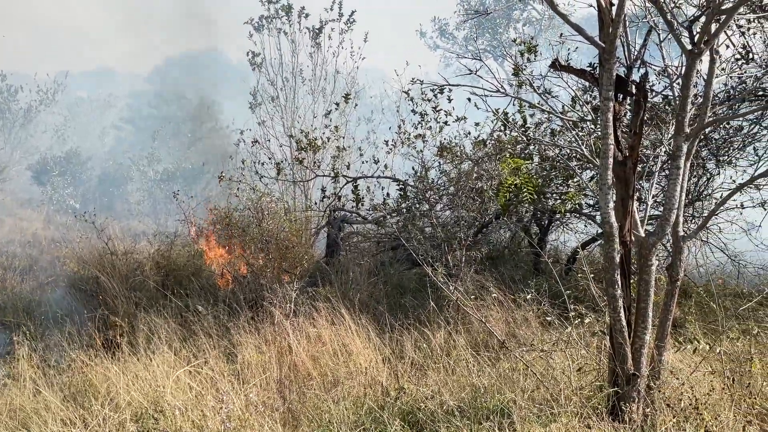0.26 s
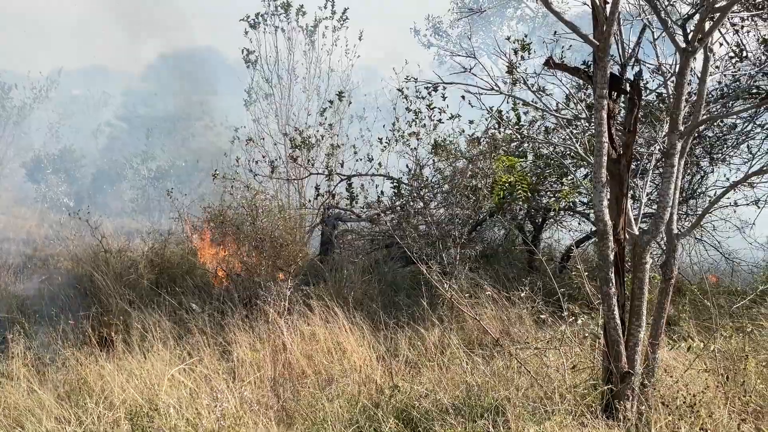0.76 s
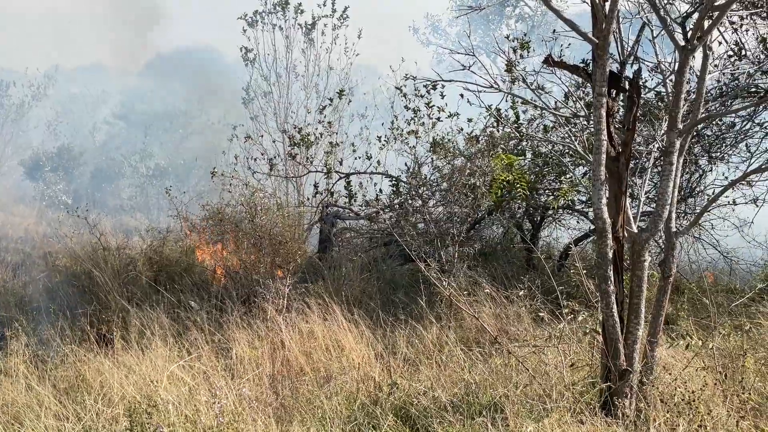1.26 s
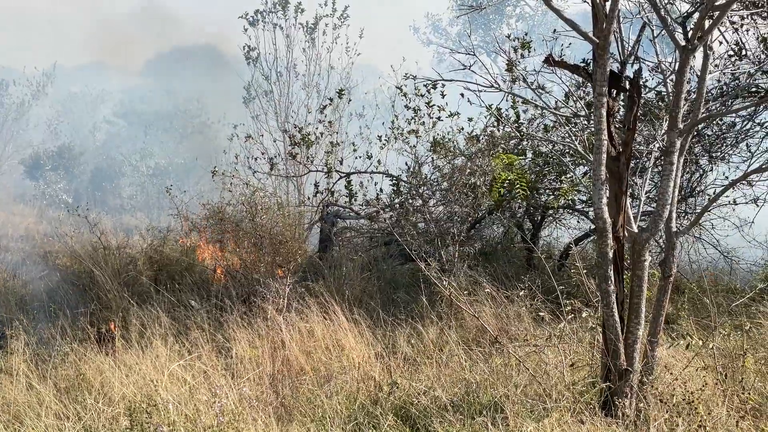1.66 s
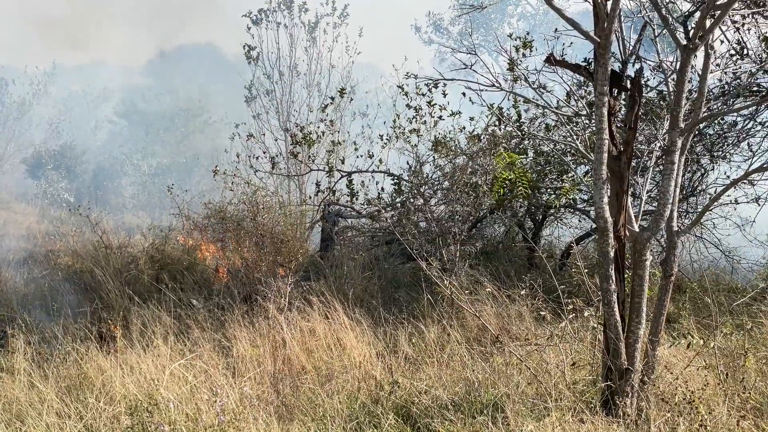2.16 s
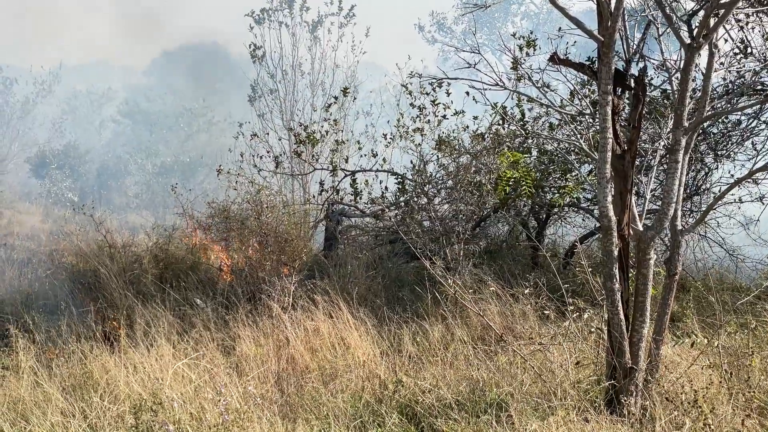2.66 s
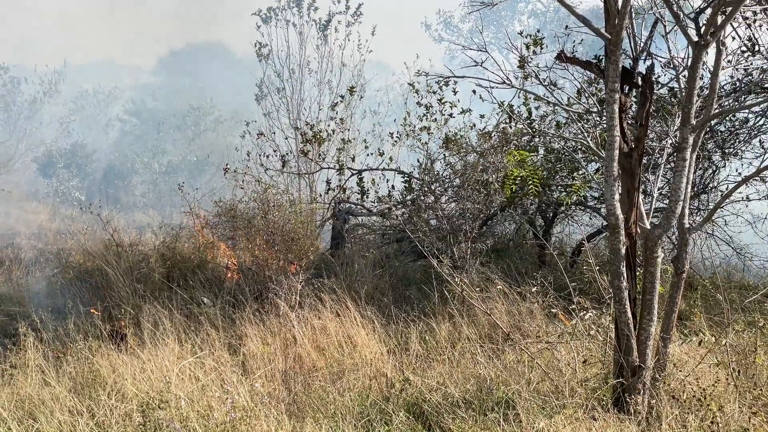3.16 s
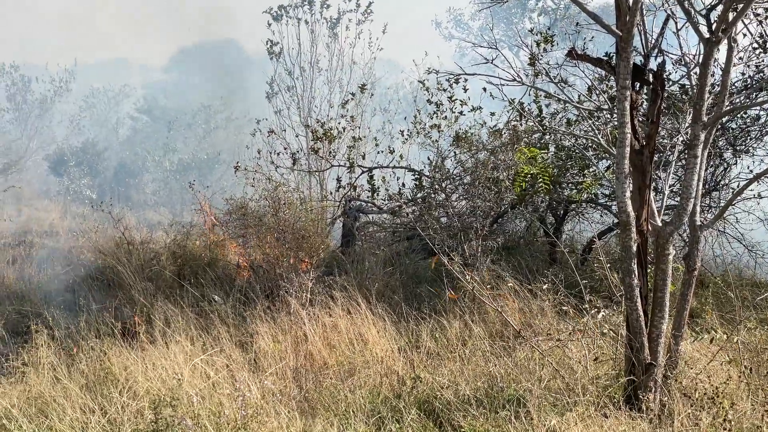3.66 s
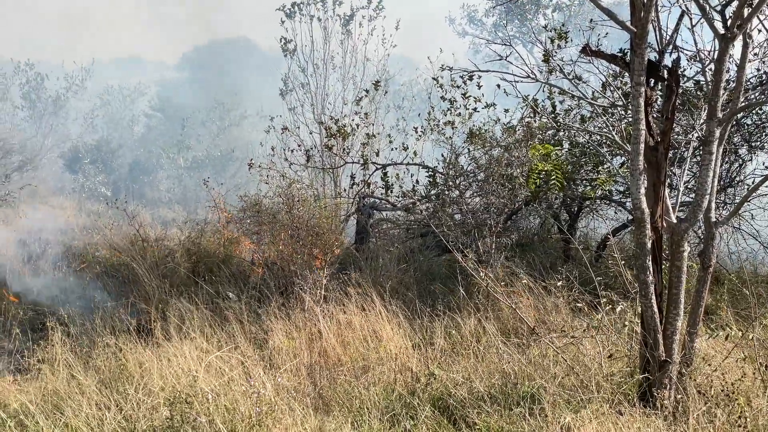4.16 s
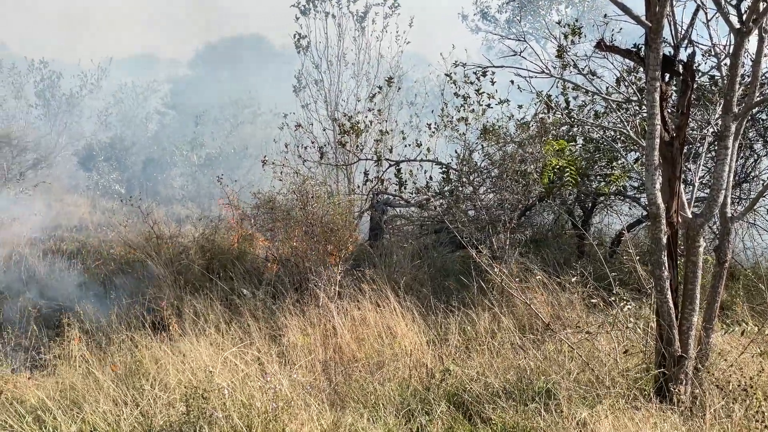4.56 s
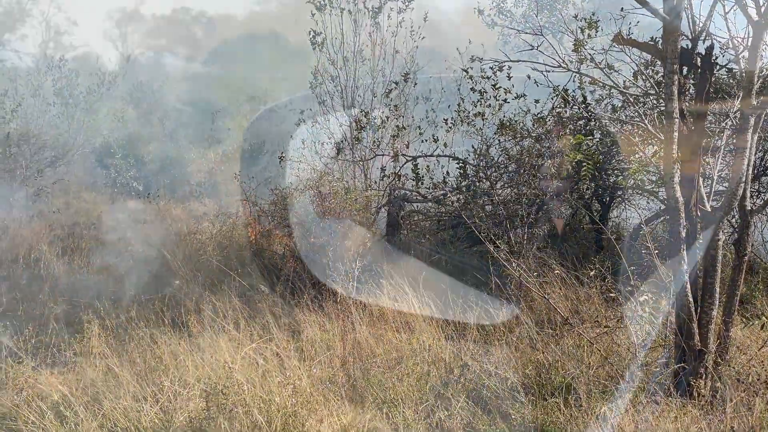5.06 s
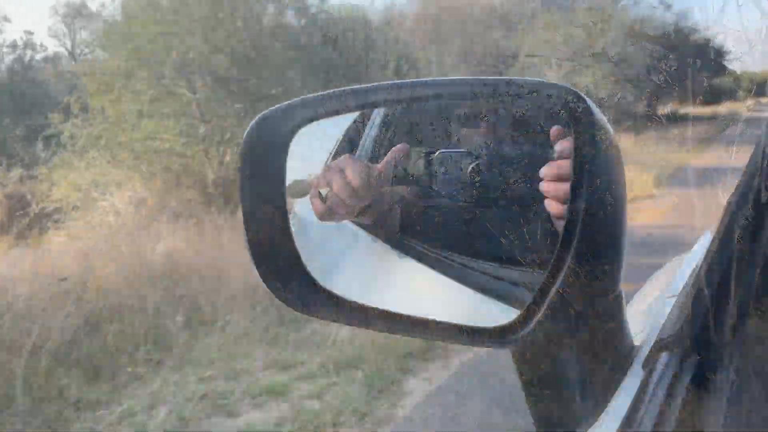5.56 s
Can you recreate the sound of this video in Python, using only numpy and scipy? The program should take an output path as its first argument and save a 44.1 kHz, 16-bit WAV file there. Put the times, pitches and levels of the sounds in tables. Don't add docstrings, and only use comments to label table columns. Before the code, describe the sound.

Outdoors, burning dry grass and shrubs make a dense fine crackle with steady hiss and a quiet low roar. Sharp bright pops burst irregularly, with a branch tearing and a big crack about two and a half seconds in. Pops then thin out, apart from a tight cluster after three and a half seconds. At the end the fire fades and wind rumbles and thuds on the stereo microphone.

```python
import sys
import numpy as np
from scipy import signal
from scipy.fft import rfft, irfft, next_fast_len
from scipy.io import wavfile
from scipy.ndimage import uniform_filter1d

SR = 44100
rng = np.random.default_rng(int(sys.argv[2]) if len(sys.argv) > 2 else 0)


def elevation(decibels):
    levels = np.asarray(decibels, float)
    return 10 ** (levels / 20)


def dump(signal):
    limited = np.clip(np.atleast_2d(signal).T, -1, 1)
    pcm = np.round(limited * 32767).astype(np.int16)
    wavfile.write(sys.argv[1], SR, pcm)


N = 255780

# (time [s], level [dB])
BLAZE_LEVEL = [(0, -49), (.68, -49), (1.87, -50), (2.24, -48.5), (3, -49.5), (4.3, -51), (4.57, -50.5),
               (5.0, -51), (5.3, -56), (5.5, -65.5), (5.65, -77), (5.8, -99)]
# (frequency [Hz], density [dB per Hz])
HISS_SPECTRUM = [(300, -16), (700, -12), (1300, -1.5), (2200, -4), (3200, -1.5), (5500, 1), (7500, 2),
                 (8700, -0.5), (10500, -1), (13500, -5.5), (14800, -3), (15900, -14.5), (16200, -27),
                 (17000, -37)]
# (frequency [Hz], density [dB per Hz])
ROAR_SPECTRUM = [(12, -28), (20, -17.5), (49, 3), (81, 0), (204, -4.5), (323, -13), (700, -20), (910, -30),
                 (1540, -120)]
ROAR_DB, CRACKLE_DB, HISS_DB, TICKS_DB = -53.5, 0, -0.5, -3.5
STEADY_EDGE_HZ = 15950

# (time [s], level [dB])
WIND_LEVEL = [
    (4.95, -51.5),
    (5.1, -50),
    (5.24, -36),
    (5.33, -42),
    (5.4, -37.5),
    (5.46, -40.5),
    (5.61, -34),
    (5.67, -37.5),
    (5.8, -35.5),
]
# (frequency [Hz], density [dB per Hz])
BUFFET_SPECTRUM = [(15, -27), (30, -11), (50, 5.5), (85, -3.5), (150, -12), (230, -17.5), (400, -29.5),
                   (1000, -43), (3000, -57), (8000, -86)]
# (time [s], peak [dB], edge re peak [dB])
EDDY_THUDS = [(5.133, -49, -33), (5.167, -45.5, -33), (5.203, -45, -22), (5.248, -46, -35),
              (5.302, -37, -36), (5.309, -40.5, -27), (5.376, -38.5, -15), (5.41, -41, -11),
              (5.423, -42.5, -28), (5.467, -54, -35), (5.488, -42, -39), (5.502, -43, -39),
              (5.526, -39, -26), (5.571, -47, -38), (5.601, -34.5, -16), (5.611, -37, -34),
              (5.627, -42.5, -38), (5.648, -42.5, -39), (5.701, -53.5, -27), (5.736, -42.5, -40),
              (5.766, -34, -16.5)]
EDDY_T60_S = 0.017

# (time [s], level [dB], centre [Hz], t60 [s])
BRANCH_SPLITS = [
    (2.5905, -25, 1330, 0.026),
    (2.4, -34, 1200, 0.029),
    (.6672, -33.5, 550, 0.0075),
    (5.7657, -45, 1760, 0.004),
]
# (time [s], level [dB])
SAP_BOOMS = [
    (0.3688, -42.5),
    (0.6696, -31.5),
    (1.832, -41.5),
    (2.5918, -38),
    (2.706, -42.5),
]

# (time [s], peak [dB], ring [Hz], thump re peak [dB], fizz re peak [dB])
BIG_STEMS = [(.0921, -21, 5100, -28.5, -12), (0.318, -26.5, 5100, -14.5, -31),
             (0.4857, -28, 5520, -16.5, -26), (0.5192, -21.5, 4540, -40, -34), (.6674, -20, 4900, -15.5, 1),
             (0.7479, -27, 6500, -21, -12), (1.007, -23.5, 4140, -22, -3), (1.0703, -26, 4700, -19, -8),
             (1.3675, -25, 3900, -25, -13.5), (1.832, -30.5, 4370, -27, -3.5),
             (1.885, -28.5, 5760, -24, -6), (2.0275, -24, 6860, -23, -3), (2.1757, -24, 4500, -31.5, -1),
             (2.4359, -27.5, 5550, -34, -9), (2.5718, -24.5, 5600, -16, -17), (2.5911, -20, 5400, -4, 3.5),
             (2.7058, -23, 5000, -17, -25), (3.6126, -25, 6110, -21, -7), (3.6268, -22, 5030, -39.5, -24.5),
             (3.6317, -21.5, 5100, -15.5, -13), (3.6425, -23, 6200, -28.5, 1),
             (3.662, -23.5, 6740, -33, -27), (4.325, -29.5, 4470, -24, -2), (4.3276, -28.5, 3620, -14, -19)]
# (time [s], peak [dB], ring [Hz])
TWIG_SNAPS = [(.0056, -35.5, 5000), (.0767, -39.5, 4630), (.457, -36, 2450), (.6853, -35, 5010),
              (.8946, -34.5, 5630), (1.0768, -34, 5800), (1.4522, -35.5, 5760), (1.7119, -30.5, 4800),
              (1.7375, -35, 5640), (1.7856, -33.5, 3960), (1.7987, -30, 5290), (1.816, -37.5, 6390),
              (1.8355, -31, 4030), (2.0824, -28.5, 4400), (2.0911, -34, 4380), (2.2855, -35.5, 4610),
              (2.4007, -33, 4250), (2.4719, -35, 5390), (2.6152, -32, 5660), (2.6835, -32.5, 6600),
              (3.5906, -35, 3880), (3.649, -31.5, 6230), (3.77, -36.5, 3600), (3.855, -33.5, 4500),
              (4.0631, -30.5, 3480), (4.3818, -30.5, 5860), (4.4014, -38.5, 4500), (4.6205, -34, 4770),
              (4.7426, -30, 5600), (5.075, -31.5, 3660)]
TWIG_THUMP_DB, TWIG_FIZZ_DB = -23.5, -15.5
# (time [s], peak [dB], ring [Hz])
STALK_SNAPS = [(.046, -41.5, 5760), (.3674, -31, 5000), (.4272, -31.5, 3870), (.4799, -35.5, 5870),
               (.7196, -31, 4470), (.7336, -39, 5560), (1.043, -33.5, 3920), (1.0939, -37.5, 5610),
               (1.1674, -39.5, 5720), (1.2046, -33, 5800), (1.2898, -35, 6700), (1.4386, -29, 5900),
               (1.5287, -32.5, 6470), (1.6437, -33.5, 3640), (2.086, -34, 5750), (2.3236, -30, 7170),
               (2.4512, -39.5, 5660), (2.7481, -32.5, 5570), (3.1696, -33.5, 5600), (3.2837, -32.5, 5250),
               (3.454, -31, 5280), (3.4664, -31, 5350), (3.8469, -35.5, 3780), (3.9422, -34.5, 4020),
               (4.01, -35, 5450), (4.533, -33, 6350), (4.5943, -37, 6260), (4.6706, -33.5, 5680),
               (4.9579, -36, 5350), (5.3029, -30, 5550)]
STALK_THUMP_DB, STALK_FIZZ_DB = -19, -1.5
# (time [s], peak [dB], ring [Hz])
WOODY_KNOCKS = [(.163, -39.5, 2130), (.1835, -39, 2820), (.314, -41.5, 2170), (.6198, -33, 3970),
                (.7763, -33, 5960), (.8404, -38, 4220), (.9353, -36.5, 2950), (.9793, -46, 3480),
                (1.1455, -35, 2860), (1.4566, -32.5, 3120), (1.5946, -37.5, 1960), (2.0971, -30, 3680),
                (2.1324, -36.5, 4970), (2.193, -36, 2890), (2.6092, -31.5, 3620), (2.8389, -39.5, 2880),
                (2.8809, -39.5, 3020), (2.961, -39.5, 2400), (3.24, -33.5, 5100), (3.382, -37, 3300),
                (3.4054, -32, 4330), (3.8297, -33, 4960), (3.8595, -38, 3520), (4.2201, -37, 4100),
                (4.5697, -35, 3270), (4.6242, -36, 3470), (4.6612, -33, 4230), (4.9146, -37.5, 2840),
                (5.0234, -41.5, 2240), (5.2146, -40.5, 3500)]
KNOCK_THUMP_DB, KNOCK_FIZZ_DB = -8.5, -10.5
KNOCK_SLOPE_DB_PER_OCT = -7
# (time [s], peak [dB])
BLADE_TICKS = [(0.238, -36), (.251, -38), (.2682, -37), (.356, -36), (.3947, -43), (.4903, -35),
               (0.875, -45), (1.128, -36), (1.2656, -41), (1.344, -42), (1.3956, -41), (1.478, -42),
               (1.9211, -36), (2.0098, -37), (2.1624, -38), (2.2127, -36), (2.2942, -36), (2.6414, -41.5),
               (2.854, -36.5), (3.0023, -39), (3.221, -38), (3.42, -34), (3.7064, -38), (4.321, -37.5),
               (4.4735, -38.5), (4.8172, -38.5), (5.1768, -39.5), (5.336, -39), (5.387, -40.5),
               (5.413, -48)]
BLADE_RING_HZ, BLADE_THUMP_DB, BLADE_FIZZ_DB = 5600, -19.5, -8.5
COLOUR_SPREAD_DB = 3.5
LEAD_S = .002

# (frequency [Hz], left lead [rad])
PHASE_LEAD = [(0, 0), (690, 0.4), (1720, -0.1), (3270, 0.3), (5170, 0.5), (5770, -1.6), (6800, -0.7),
              (7240, -1.4), (7580, -2.5), (9560, -3.4), (12800, -6.1), (15800, -6.4), (16100, -6.8),
              (16500, -6.5)]
# (frequency [Hz], left minus right [dB])
BALANCE = [(100, 0), (300, .5), (600, 2.8), (1200, .8), (2000, 0), (4000, 0)]
# (frequency [Hz], common share [0-1])
LIKENESS = [(60, .95), (700, .8), (1800, .955), (5000, .9), (7500, .91), (8800, .925), (10500, .91),
            (14000, .935)]
BASS_LAG_CYCLES, TOP_HZ, LOW_CUT_HZ = .9, 16900, 41


def evened(x):
    return x / np.sqrt(np.mean(x ** 2, -1, keepdims=True) + 1e-20)


def read(points, hz):
    f, value = np.transpose(points)
    return np.interp(np.log(hz + 1), np.log(f + 1), value)


def follow(rows):
    s, db = np.transpose(rows)
    return elevation(np.interp(np.arange(N) / SR, s, db, left=-120))


def add(mix, s, sound):
    part = mix[..., max(round(s * SR), 0):][..., :sound.shape[-1]]
    part += sound[..., :part.shape[-1]]


def hump(hz, centre_hz, octaves):
    return np.exp(-.5 * (np.log2((hz + 1) / centre_hz) / octaves) ** 2)


def noise(spectrum, patchy_db, flicker_db, size):
    frames, hz = 4 * N // size + 5, np.fft.rfftfreq(size, 1 / SR)
    a, b, c, d, patches = rng.standard_normal((frames, len(hz), 5)).T
    patches = uniform_filter1d(patches, size=6, axis=0)
    patches = evened(uniform_filter1d(patches, size=6, axis=1))
    flicker = rng.standard_normal(frames)
    level_db = read(spectrum, hz)[:, None] + patchy_db * patches + flicker_db * flicker
    z = np.array([a + 1j * b, c + 1j * d]) * elevation(level_db)
    pair = signal.istft(z, nperseg=size, noverlap=3 * size // 4)[1]
    return evened(pair[:, :N])


def puffs(rows, band_of, rise_s, lead_s=.006):
    size, out = 2048, np.zeros((2, N))
    t = np.maximum(np.arange(size) / SR - lead_s, 0)
    hz = np.fft.rfftfreq(size, 1 / SR)
    airs = rng.standard_normal((len(rows), 2, size))
    for (s, db, colour, t60_s), air in zip(rows, airs):
        swell = (1 - np.exp(-t / rise_s)) ** 2 * elevation(-60 * t / max(t60_s, .005))
        spectrum = rfft(air * swell)
        spectrum /= uniform_filter1d(abs(spectrum) ** 2, size=11) ** .4
        puff = evened(irfft(spectrum * band_of(hz, colour)))
        rms_re_peak = np.sqrt(np.mean(swell ** 2)) / swell.max()
        add(out, s - 2 * rise_s - lead_s, elevation(db) * puff * rms_re_peak)
    return out


def snaps(ring_hz, thump_db, fizz_db, size=1024):
    t, hz = np.arange(size) / SR - LEAD_S, np.fft.rfftfreq(size, 1 / SR)
    air = rng.standard_normal((len(ring_hz), 2, size))
    air[:, :, np.argmin(abs(t))] += 7 * np.sign(air[:, :, 0])
    onset = np.exp(-(t / .0003) ** 2)
    splinters, scatter = elevation(-60 * t / .004), elevation(-19 - 60 * t / .035)
    spectrum = rfft(air * np.where(t < 0, onset, splinters + scatter))
    spectrum /= uniform_filter1d(abs(spectrum) ** 2, size=21) ** .3

    def part(band):
        x = irfft(spectrum * band, size)
        return x / np.sqrt((x[:, :1, :260] ** 2).sum(-1, keepdims=True) / 100)

    mouth = elevation(read(HISS_SPECTRUM, hz))
    thump = part(hump(hz, 1086, 1.0))
    ring = part(mouth * (hump(hz, ring_hz[:, None, None], 0.65) + 0.38 * hump(hz, 3820, 0.89)))
    fizz = part(mouth * hump(hz, 13500, .28))
    return ring + elevation(thump_db)[:, None, None] * thump + elevation(fizz_db)[:, None, None] * fizz


def wind():
    def thud_band(hz, edge_db):
        return hump(hz, 364, 0.88) + elevation(edge_db - 5.5) * hump(hz, 1420, 0.51)

    thuds = puffs([(*row, EDDY_T60_S) for row in EDDY_THUDS], thud_band, rise_s=0.002196)
    buffet = noise(BUFFET_SPECTRUM, patchy_db=2.0, flicker_db=2.0, size=1024)
    return follow(WIND_LEVEL) * buffet + elevation(3.5) * thuds


def roar():
    rumble = noise(ROAR_SPECTRUM, patchy_db=2.0, flicker_db=2.2, size=2048)
    return elevation(ROAR_DB) * rumble * np.minimum(follow(BLAZE_LEVEL) / elevation(-58), 1) ** 0.29


def lulls(depth_db):
    t = np.arange(N) / SR
    waves = sum(np.sin(2 * np.pi * (f * t + rng.random())) for f in np.geomspace(2, 20, 16))
    return elevation(depth_db * evened(waves))


def crackle(per_s=600, spread_db=3.0, count=24):
    kind = rng.random((count, 3))
    grains = snaps(1800 * 6.1 ** kind[:, 0], -22 + 16 * kind[:, 1], -14 + 16 * kind[:, 2])
    chance, size, which = rng.random((3, N))
    size_db = spread_db * np.minimum(-np.log(size + 1e-9), 4)
    train = (chance < per_s / SR) * elevation(size_db)
    kinds = (which * count).astype(int) == np.arange(count)[:, None]
    return evened(signal.oaconvolve((train * kinds)[:, None], grains, axes=2).sum(0)[:, :N])


def blaze():
    mix = elevation(CRACKLE_DB) * crackle()
    mix += elevation(TICKS_DB) * crackle(per_s=30, spread_db=1.8, count=12)
    mix += elevation(HISS_DB) * noise(HISS_SPECTRUM, patchy_db=3.0, flicker_db=3.0, size=256)
    steady = follow(BLAZE_LEVEL) * lulls(depth_db=1.36) * mix
    return irfft(rfft(steady) * (np.fft.rfftfreq(N, 1 / SR) < STEADY_EDGE_HZ), N)


def branch():
    return puffs(BRANCH_SPLITS, lambda hz, centre_hz: hump(hz, centre_hz, 0.85), rise_s=.0004)


def booms():
    out = np.zeros((2, N))
    u = np.arange(900) / SR / .0006
    for at, db in SAP_BOOMS:
        add(out[0], at, elevation(db + 14) * u * (2 - u) * np.exp(-u))
    return out


def stems():
    def kind(rows, thump_db, fizz_db, slope_db=0):
        s, db, hz = np.transpose(rows)
        a, b = COLOUR_SPREAD_DB * rng.standard_normal((len(rows), 2)).T
        return np.array([s, db, hz, thump_db + slope_db * np.log2(hz / 3000) + a, fizz_db + b])

    blades = [(*row, BLADE_RING_HZ) for row in BLADE_TICKS]
    return np.hstack([np.transpose(BIG_STEMS),
                      kind(TWIG_SNAPS, TWIG_THUMP_DB, TWIG_FIZZ_DB),
                      kind(STALK_SNAPS, STALK_THUMP_DB, STALK_FIZZ_DB),
                      kind(WOODY_KNOCKS, KNOCK_THUMP_DB, KNOCK_FIZZ_DB, KNOCK_SLOPE_DB_PER_OCT),
                      kind(blades, BLADE_THUMP_DB, BLADE_FIZZ_DB)])


def pops():
    s, peak_db, ring_hz, thump_db, fizz_db = stems()
    out = np.zeros((2, N))
    for at, db, snap in zip(s, peak_db, snaps(ring_hz, thump_db + .5, fizz_db - 3.0)):
        add(out, at - LEAD_S, elevation(db - 0.54) * snap)
    return out


def ports(pair):
    size = next_fast_len(N + SR // 4)
    hz = np.fft.rfftfreq(size, 1 / SR)
    lag = np.exp(-2j * np.pi * BASS_LAG_CYCLES * np.log(hz + 60))
    low_cut = 1 / np.sqrt(1 + (LOW_CUT_HZ / (hz + 1)) ** 6)
    common, odd = rfft(pair, size) * lag * low_cut * (hz < TOP_HZ)
    angle = np.arccos(np.clip(read(LIKENESS, hz), 0, 1)) / 2
    phase = np.interp(hz, *np.transpose(PHASE_LEAD))
    lean = elevation(read(BALANCE, hz) / 2) * np.exp(.5j * phase)
    left = (np.cos(angle) * common + np.sin(angle) * odd) * lean
    right = (np.cos(angle) * common - np.sin(angle) * odd) / lean
    return irfft(np.array([left, right]), size)[:, :N]


def scene():
    return ports(wind() + roar() + blaze() + branch() + booms() + pops())


def roll_off(x):
    return signal.sosfilt(signal.butter(12, 16980, fs=SR, output="sos"), x)


def record(dry):
    return roll_off(dry)


dry = scene()
out = record(dry)
dump(out)
```